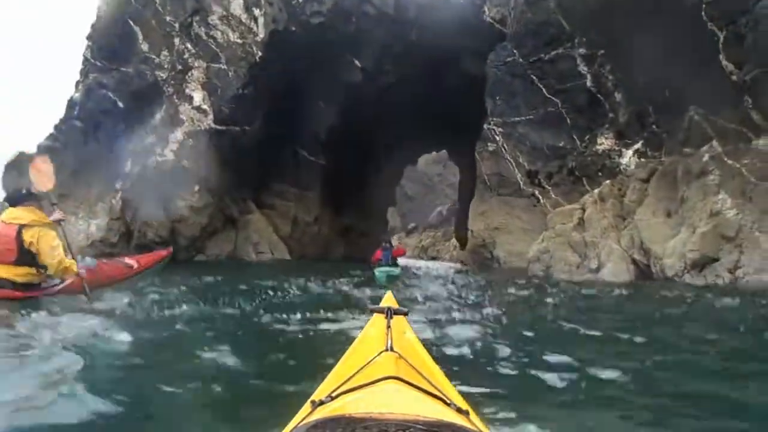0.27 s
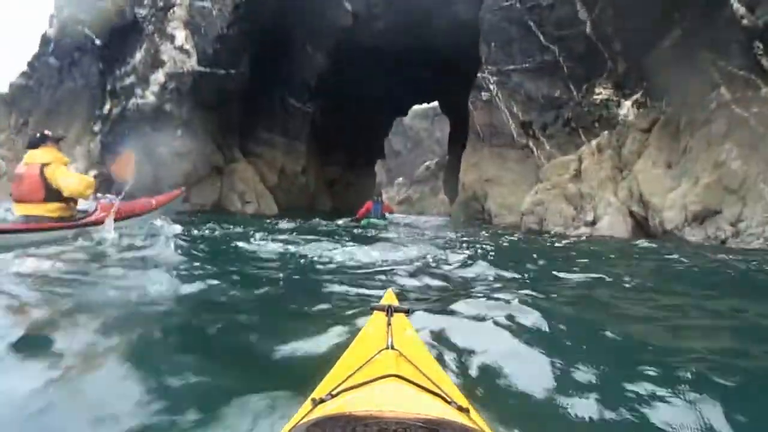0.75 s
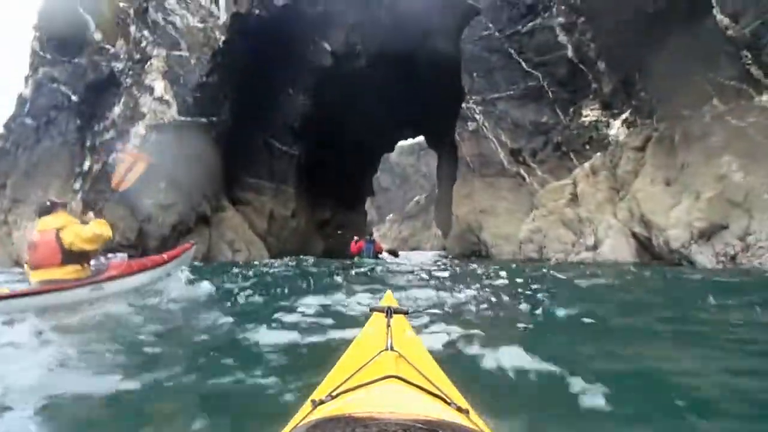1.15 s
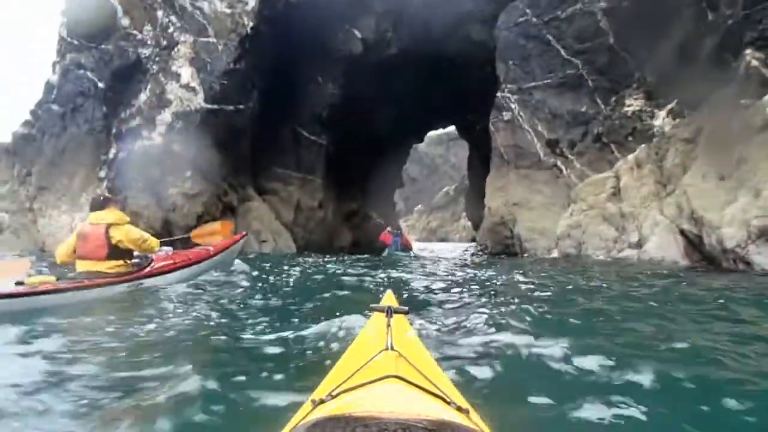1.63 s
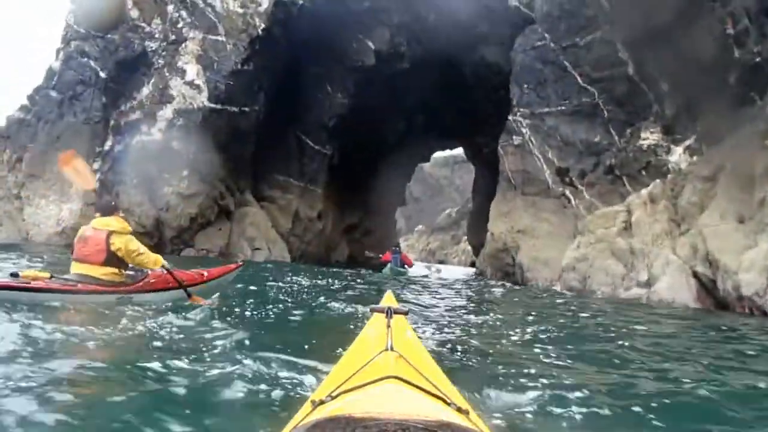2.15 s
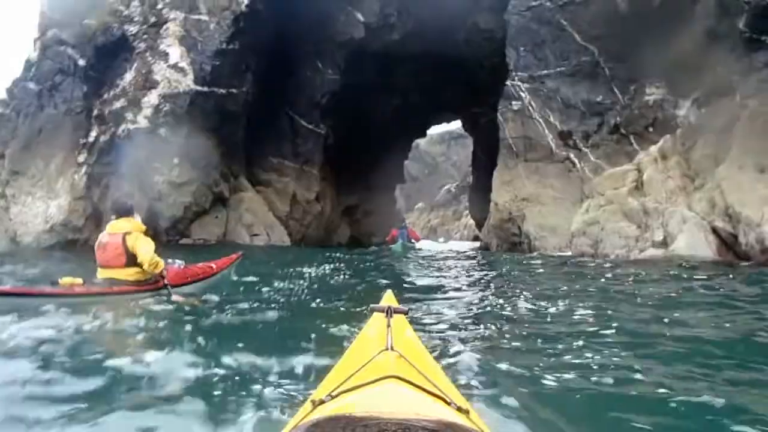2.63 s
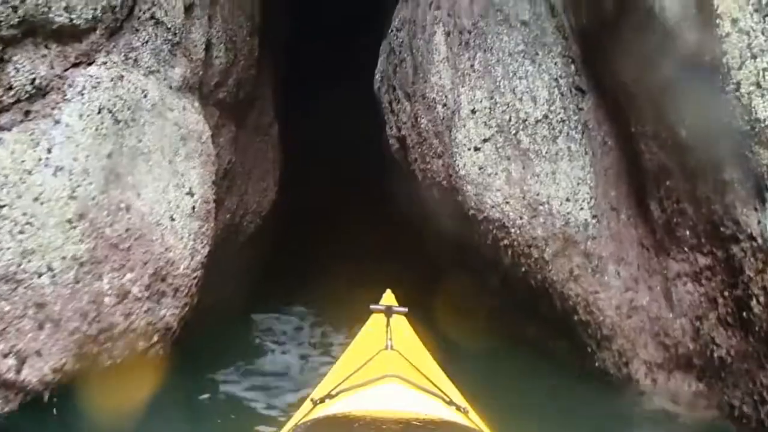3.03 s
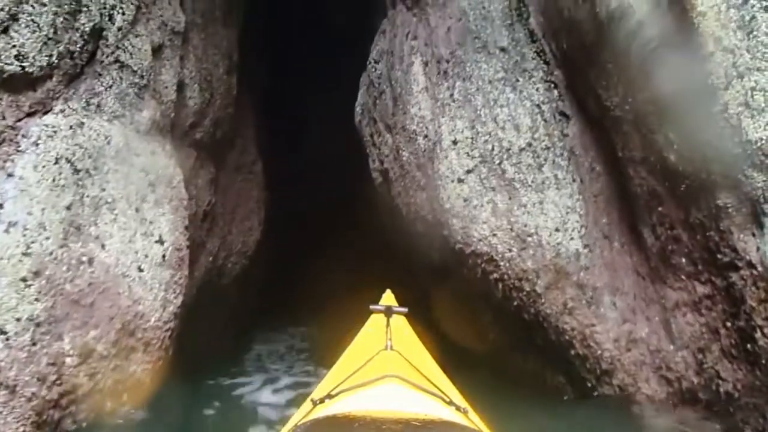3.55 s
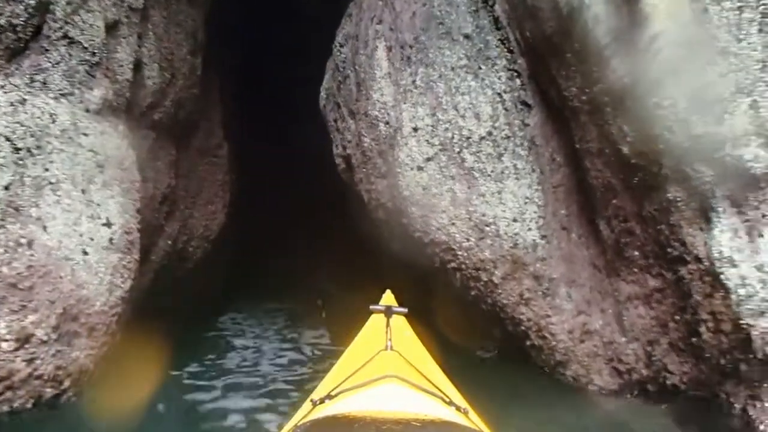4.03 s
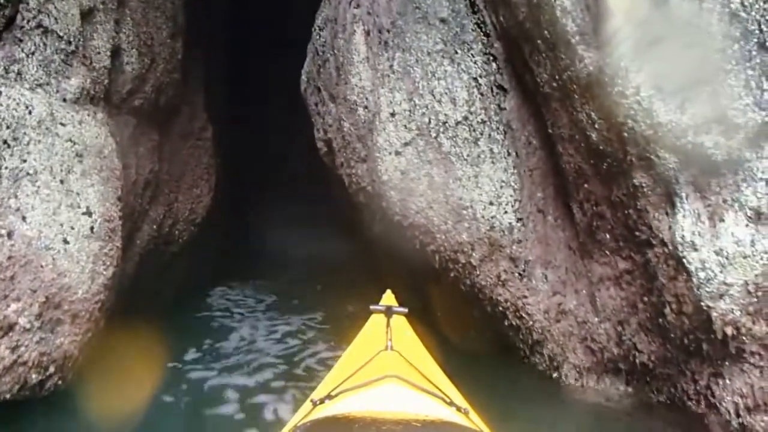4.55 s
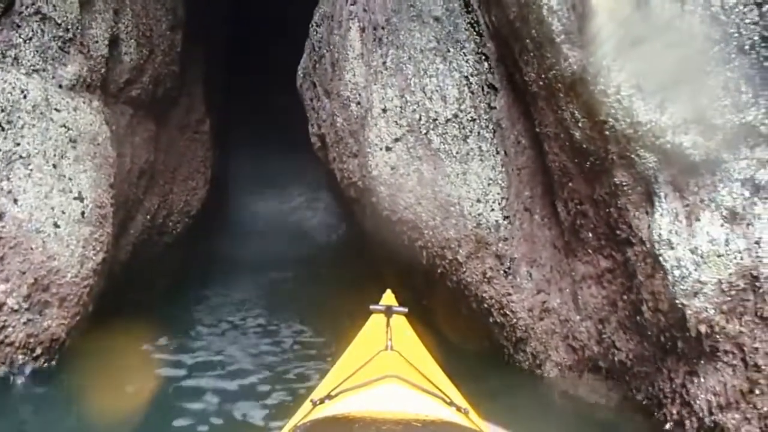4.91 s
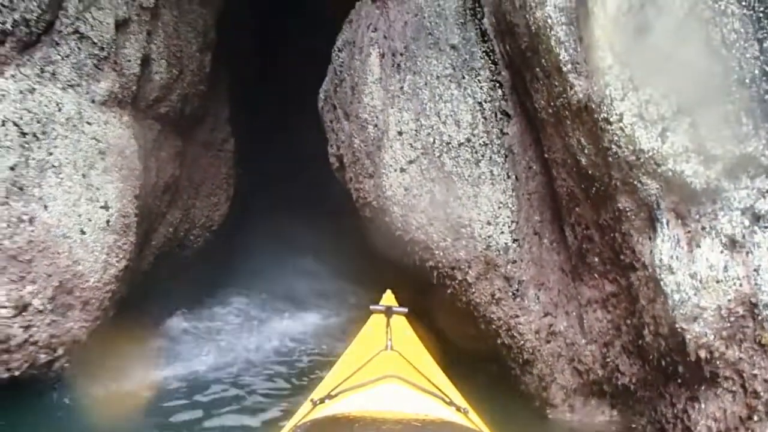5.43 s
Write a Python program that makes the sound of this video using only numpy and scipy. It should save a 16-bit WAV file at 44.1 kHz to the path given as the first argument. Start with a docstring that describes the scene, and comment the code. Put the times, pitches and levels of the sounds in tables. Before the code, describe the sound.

A close, mono microphone in a waterproof case hears quiet sea water: low lapping, soft slosh, fizzing foam, drips and bubbly plops. Just before three seconds, a sharp change brings a burst of splash and hiss between rock walls. Waves then break in overlapping surges, growing strongest past four seconds, with a deep cavity boom, a heavy thump near five seconds, and a bright watery wash continuing to the end.

```python
"""Sea water laps around a kayak below a cliff: clouds of damped, rising sines over noise make lap, slosh and foam.
Drops tick as short ringing bursts, trapped air thumps as unsteady low sines, and large bubbles plop as gliding sines.
Then the boat lies in a narrow rock gully: waves break into churn, splash and hissing spray, made of bubbles
and noise under surge envelopes, and swells boom through the air modes of the cleft.
All is mono; a waterproof housing rings in the treble of the water and the drops."""
import sys
import numpy as np
from scipy import signal
from scipy.fft import rfft, irfft, next_fast_len
from scipy.io import wavfile
from scipy.ndimage import map_coordinates

SR = 44100
rng = np.random.default_rng(int(sys.argv[2]) if len(sys.argv) > 2 else 0)


def store_pcm(level_fs):
    """Save levels as 16-bit WAV."""
    pcm = np.round(np.clip(level_fs, -1, 1) * 32767).astype(np.int16)
    wavfile.write(sys.argv[1], SR, np.atleast_2d(pcm).T)


N = 250047  # length [samples]


def amp(db):
    """Logarithmic level: decibels to an amplitude gain."""
    return 10 ** (np.asarray(db) / 20)


def unit(x):
    """Normalisation of power: scale to rms 1."""
    return x / np.sqrt(np.mean(x ** 2) + 1e-20)


def curves(rows):
    """Linear interpolation: one value per sample for each column after the time."""
    knot_s, *columns = np.transpose(rows)
    return [np.interp(np.arange(N) / SR, knot_s, column) for column in columns]


def wobble(rate):
    """Band-limited random modulation: a smooth curve through rate random knots a second."""
    knots = rng.standard_normal(int(N * rate / SR) + 4)
    return map_coordinates(knots, [np.arange(N) * rate / SR])


def filtered(x, response):
    """Linear filtering: the spectrum of x times a response of frequency."""
    size = next_fast_len(N + SR // 2)
    hz = np.fft.rfftfreq(size, 1 / SR)
    return irfft(rfft(x, size) * response(hz), size)[:N]


def shape(points, hz):
    """Spectral envelope: gain of (frequency [Hz], gain [dB]) points joined on a log axis."""
    point_hz, db = np.transpose(points)
    return amp(np.interp(np.log(hz + 1), np.log(point_hz), db))


def resonance(hz, centre, width):
    """Damped simple oscillator: causal response of one mode, 1 at its centre."""
    return 1j * hz * width / (centre ** 2 - hz ** 2 + 1j * hz * width)


# resonances of the waterproof housing: (centre [Hz], width [Hz], gain of the mode alone [dB])
HOUSING_MODES = [(5750, 870, 6), (12740, 2140, 9)]


def housing(hz):
    """Modal resonance of an enclosure: each mode adds its lift to the direct sound."""
    lifts = [(amp(db) - 1) * resonance(hz, centre, width) for centre, width, db in HOUSING_MODES]
    return 1 + sum(lifts)


def add(track, start_s, sound):
    """Superposition: mix a sound into the track from its start time."""
    part = track[max(round(start_s * SR), 0):][:len(sound)]
    part += sound[:len(part)]


def bubbles(count, low_hz, high_hz, cycles, rise, spread_db):
    """Volume pulsation of gas bubbles: damped sines that rise in pitch near the surface; rms 1."""
    when, radius, strength = rng.random((count, 3)).T
    hz = low_hz * (high_hz / low_hz) ** radius
    size = amp(-spread_db * np.log(1 - .985 * strength)) * hz / low_hz
    length = (cycles * SR / hz).astype(int) + 2
    # lay all bubbles end to end, then sum each sample into its place in time
    who = np.repeat(np.arange(count), length)
    age = np.arange(len(who)) - np.repeat(np.cumsum(length) - length, length)
    life_share = age / length[who]
    decay = np.exp(-np.log(50) * life_share)
    phase = 2 * np.pi * cycles * life_share * (1 + rise * life_share / 2)
    wave = size[who] * decay * np.sin(phase)
    return unit(np.bincount((when * N).astype(int)[who] + age, wave, N)[:N])


def water(spectrum, grains, wash_db, flutter_db):
    """Incoherent summation: near bubbles over a noise wash of far ones, fluttering with ripples; rms 1."""
    colour = lambda hz: shape(spectrum, hz) * housing(hz)
    near = unit(filtered(grains, colour))
    far = unit(filtered(rng.standard_normal(N), colour))
    ripples = wobble(45)
    return unit((near + amp(wash_db) * far) * amp(flutter_db * ripples))


def patter(grains):
    """Excitation of a resonant enclosure: tiny drops tick through the housing; rms 1."""
    return unit(filtered(grains, housing))


GULLY_S = 2.745  # middle of the passage into the gully


def inside():
    """Crossfade: 0 on open water, 1 between the rocks, with a ramp of 46 ms."""
    return np.clip((np.arange(N) / SR - GULLY_S) / 0.046 + .5, 0, 1)


# filter that colours the lapping: (frequency [Hz], gain [dB])
LAP_COLOUR = [(20, -16), (50, -3), (100, -1), (160, 6), (230, 7), (380, -10.5), (700, 3), (1500, -50)]
# how lapping follows the sloshing: (mean level [dB], gain per level of sloshing [dB/dB])
LAP_LEVEL = (-50.5, 1.15)


def lapping(slosh_db):
    """Pulsation of large bubbles: wavelets lap low at the hull, livelier as the sloshing grows."""
    mean_db, growth = LAP_LEVEL
    lap_db = mean_db + growth * (slosh_db - slosh_db.mean())
    grains = bubbles(count=600, low_hz=92, high_hz=455, cycles=2.8, rise=0.22, spread_db=0.5)
    return amp(lap_db) * water(LAP_COLOUR, grains, wash_db=-1, flutter_db=0.5)


# filter that colours the sloshing: (frequency [Hz], gain [dB])
SLOSH_COLOUR = [(120, -29), (280, -3.5), (480, -0.5), (850, 3.5), (1400, -0.5), (2200, -10.5), (4500, -22)]


def sloshing(slosh_db):
    """Air entrainment: water sloshing along the cliff foot folds in mid-sized bubbles."""
    grains = bubbles(count=4500, low_hz=348, high_hz=2480, cycles=5.3, rise=0.4, spread_db=4.0)
    return amp(slosh_db + 0.5) * water(SLOSH_COLOUR, grains, wash_db=7.5, flutter_db=1.8)


# filter that colours the foam: (frequency [Hz], gain [dB])
FOAM_COLOUR = [(700, -20), (1700, -1), (3000, 1.5), (4600, -4.5), (6200, -3), (8500, -9.5), (12500, -11),
               (15500, -21.5)]


def foaming(foam_db):
    """Pulsation of small bubbles: foam fizzes, a few bubbles tinkle and tiny drops patter."""
    grains = bubbles(count=6000, low_hz=1753, high_hz=12500, cycles=29, rise=0.29, spread_db=4.5)
    foam = water(FOAM_COLOUR, grains, wash_db=6.0, flutter_db=1.33)
    # close to the hull, clear of the foam
    trickle = bubbles(count=160, low_hz=1595, high_hz=6300, cycles=28, rise=.12, spread_db=-0.5)
    ticks = patter(bubbles(count=400, low_hz=2000, high_hz=11200, cycles=6, rise=.1, spread_db=5.5))
    return amp(foam_db + 1) * (foam + amp(-12.5) * trickle + amp(-18) * ticks)


# liveliness of the open water: (time [s], sloshing before trim [dB], foam before trim [dB])
OPEN_WATER_LEVELS = [(0.0, -40.5, -37), (0.61, -43, -38.5), (0.75, -44, -39.5), (0.95, -44.5, -39.5),
                     (1.26, -41, -37.5), (1.52, -42, -37.5), (1.72, -37.5, -36.5), (1.9, -40, -34),
                     (2.06, -34, -34), (2.27, -39, -36.5), (2.5, -41, -37), (2.65, -37, -36),
                     (2.74, -28.5, -32)]


def open_water():
    """Common modulation: one course of sloshing levels drives lapping and sloshing, a second course drives the
    bursting foam."""
    slosh_db, foam_db = curves(OPEN_WATER_LEVELS)
    return lapping(slosh_db) + sloshing(slosh_db) + foaming(foam_db)


# loudest drops near the microphone:
# (time [s], level before trim and housing [dB], pitch [Hz], length of ringing [cycles])
NEAR_DROPS = [(0.0853, -8, 6260, 3), (0.68, -21, 2110, 3.6), (1.0315, -26, 5650, 6), (1.094, -9, 4600, 3.7),
              (1.1074, -8.5, 8000, 1.6), (1.202, -4, 8800, 2.3), (1.293, -24, 3050, 16),
              (1.45, -18.5, 2540, 6.1), (1.654, -24.5, 3170, 14), (1.835, -19, 5500, 10),
              (2.007, -14, 8500, 4), (2.1882, -15, 2850, 4.2), (2.4365, -18, 3020, 5.4),
              (2.667, -14.5, 5900, 6), (2.689, -14, 3220, 10), (2.7, -14, 2560, 5.1),
              (2.715, -10, 9000, 2.5), (2.899, -10, 5770, 11), (2.915, -15, 12200, 18),
              (2.938, 2, 4000, 4.2), (3.234, -11, 5760, 9), (3.476, -12, 11000, 5.5),
              (3.5, -2.5, 2840, 2.3)]


def drops():
    """Impact excitation: each drop rings briefly and scatters spatter around its own pitch."""
    out, t = np.zeros(N), np.arange(SR // 30) / SR
    for start_s, db, hz, cycles in NEAR_DROPS:
        age = 5 * hz * t / cycles
        tick = age * np.exp(1 - age) * np.sin(2 * np.pi * hz * t)
        # noise convolved with the tick takes on its pitch
        spatter = unit(signal.fftconvolve(rng.standard_normal(len(t)), tick)[:len(t)])
        spatter_decay = amp(-60 * t / 0.034)
        add(out, start_s, amp(db - 3.5) * (tick + 0.059 * spatter * spatter_decay))
    return filtered(out, housing)


# waves that slap the hull or trap air under the rock:
# (time [s], level before trim and onset [dB], mean pitch [Hz], time to fall by 26 dB [s])
AIR_POCKETS = [(.428, -35, 109, 0.055), (0.976, -38, 213, 0.14), (1.32, -39, 70, .05),
               (1.44, -37, 90, 0.042), (1.716, -33.5, 213, 0.1), (2.02, -29, 139, 0.042),
               (2.11, -38, 210, 0.13), (2.258, -26, 128, 0.026), (2.84, -31.5, 166, 0.14),
               (3.201, -27, 178, 0.042), (3.79, -24, 73.5, 0.12), (3.899, -30, 111.5, 0.36),
               (3.798, -26, 195, 0.28), (4.42, -25, 57.5, 0.2), (4.599, -22, 147, 0.092),
               (4.951, -14.5, 93, 0.042), (4.955, -19, 238, 0.079)]


def thumps():
    """Cavity pulsation: a wave closes on a pocket of air, which throbs for a few uneven cycles."""
    out, t = np.zeros(N), np.arange(SR // 2) / SR
    for start_s, db, hz, fall_s in AIR_POCKETS:
        pitch = hz * (1 + 0.08 * wobble(69)[:len(t)])
        onset = 1 - np.exp(-t / 0.0059)
        decay = amp(db - 4 - 26 * t / fall_s)
        add(out, start_s, onset * decay * np.sin(2 * np.pi * np.cumsum(pitch) / SR))
    return out


# single large bubbles beside the hull:
# (time [s], level before trim and onset [dB], starting pitch [Hz], pitch rise [octaves])
LARGE_BUBBLES = [(0.574, -28, 1480, .25), (.891, -23, 746, 0.62), (1.719, -32, 300, .3),
                 (1.732, -23, 428, 0.64), (1.751, -34, 340, .4), (2.127, -21, 770, 0.74),
                 (2.419, -20, 1160, .35), (2.4625, -21, 614, .73), (2.470, -20.5, 950, 0.49),
                 (2.697, -21, 670, .3), (4.186, -14, 1170, 0.37), (5.382, -18, 394, 0.051)]
PLOP_LIFE_S = 0.0145  # from pinching off to surfacing


def plops():
    """Pulsation near a free surface: a bubble pinches off with a small splash, glides up and dies away."""
    out, t = np.zeros(N), np.arange(SR // 12) / SR
    age = t / PLOP_LIFE_S
    for start_s, db, hz, octaves in LARGE_BUBBLES:
        pitch = hz * 2 ** (octaves * np.minimum(age, 1))
        onset = 1 - np.exp(-t / 0.0012)
        decay = amp(db - 1.0 - 10 * age - 10 * age ** 2)
        ring = np.sin(2 * np.pi * np.cumsum(pitch) / SR)
        small_splash = 0.15 * rng.standard_normal(len(t))
        add(out, start_s, onset * decay * (ring + small_splash))
    return out


def surge(start, rise, hold, fade):
    """Build-up and exponential decay: one wave grows smoothly, holds, then drains away."""
    t = np.arange(N) / SR - start
    growth = np.sin(np.pi / 2 * np.clip(t / rise, 0, 1)) ** 2
    return growth * np.exp(-np.maximum(t - rise - hold, 0) / fade)


def piled(rest_db, peaks_db, envelopes):
    """Addition of powers: level [dB] of overlapping waves over the resting water of the gully."""
    rest_power = inside() * amp(rest_db) ** 2
    wave_power = amp(peaks_db) ** 2 @ np.square(envelopes)
    return 10 * np.log10(rest_power + wave_power + 1e-20)


# filters that colour churn, splash and spray: (frequency [Hz], gain [dB])
CHURN_COLOUR = [(120, -40), (300, -7), (550, -3), (1100, 1), (1700, -2.5), (2600, -8), (5000, -37)]
SPLASH_COLOUR = [(700, -25), (1600, -2.5), (2400, 1), (4200, -0.5), (6000, -4.5), (8000, -13), (14000, -20)]
SPRAY_COLOUR = [(2000, -46), (4500, -6.5), (6300, 5.5), (9000, 0), (12500, -3), (14500, -12.5),
                (15600, -20)]
# waves that break on the gully walls: (start [s], rise [s], hold [s], fade time constant [s],
# splash before thinning and patter [dB], churn [dB], spray [dB])
BREAKING_WAVES = [(2.573, 0.05, .08, .04, -36, -50, -37), (2.738, 0.017, 0.0082, 0.075, -21, -28.5, -26),
                  (2.799, 0.058, 0.051, 0.018, -21.5, -29, -24.5), (3.02, 0.13, 0.073, 0.17, -24, -28, -29),
                  (3.314, .075, 0.11, 0.24, -27, -33.5, -31.5), (3.632, 0.24, 0.059, 0.15, -21, -23.5, -30),
                  (4.12, 0.068, .015, 0.1, -23.5, -25.5, -31), (4.024, 0.18, 0.16, 0.11, -31, -58, -24.5),
                  (4.255, 0.076, 0.057, 0.12, -20.5, -25.5, -19.5),
                  (4.356, 0.08, 0.14, 0.17, -22.5, -24, -23.5), (4.54, .52, 0.15, 0.7, -22, -47, -20.5),
                  (4.833, 0.11, .02, 0.079, -22, -55, -18.5), (5.275, 0.058, 0.27, 0.32, -26, -28, -28),
                  (5.56, 0.049, 0.035, .1, -24, -35, -24)]


def breakers():
    """Entrainment and break-up: waves churn in the gully, splash on the rock and throw spray."""
    waves = [surge(*times) for *times, _, _, _ in BREAKING_WAVES]
    *_, splashes_db, churns_db, sprays_db = np.transpose(BREAKING_WAVES)
    # the first level is that of the water astir between waves
    splash_db = piled(-26.5, splashes_db, waves)
    churn_db = piled(-33, churns_db, waves)
    spray_db = piled(-32.5, sprays_db, waves)
    churn_grains = bubbles(count=3500, low_hz=316.3, high_hz=2670, cycles=18.6, rise=0.11, spread_db=-1.5)
    churn = water(CHURN_COLOUR, churn_grains, wash_db=3, flutter_db=0.77)
    splash_grains = bubbles(count=9000, low_hz=1517, high_hz=7440, cycles=29, rise=0.091, spread_db=3.0)
    splash = water(SPLASH_COLOUR, splash_grains, wash_db=6.5, flutter_db=.6)
    spray_grains = bubbles(count=14000, low_hz=4640, high_hz=15100, cycles=5, rise=.1, spread_db=-4.5)
    spray = water(SPRAY_COLOUR, spray_grains, wash_db=12, flutter_db=1.0)
    ticks = patter(bubbles(count=500, low_hz=2600, high_hz=8000, cycles=7, rise=0.065, spread_db=4.0))
    # water that breaks into spray holds fewer large bubbles, so its splash turns thin and bright
    large = filtered(splash, lambda hz: 1 / (1 + (hz / 3000) ** 4))
    thin = np.clip((spray_db - churn_db) / 20, 0, .75)
    splash = (splash - thin * large) / np.sqrt(1 - 0.62 * thin)
    splash = splash + amp(-11.5) * ticks
    return amp(churn_db) * churn + amp(splash_db) * splash + amp(spray_db) * spray


# air resonances of the cleft: (centre [Hz], width [Hz], gain of the mode alone [dB])
CLEFT_MODES = [(63, 9, 6.5), (88.5, 4.6, 4), (112, 6.5, 1), (181, 6.7, -14), (209.4, 4.9, 3.5),
               (233.4, 5.8, -4), (292.5, 40, -5.5), (322.6, 8.2, 1), (414, 8.9, -5.5), (456, 19, 0.5)]


def cleft(x):
    """Modal resonance of a cavity: the narrow cave rings at its low air modes; rms 1."""
    modes = lambda hz: 0.28 + sum(amp(db) * resonance(hz, centre, width) for centre, width, db in CLEFT_MODES)
    return unit(filtered(x, modes))


# filter that colours the boom ahead of the cleft: (frequency [Hz], gain [dB])
BOOM_COLOUR = [(20, -28), (35, -25), (55, -9), (90, -7.5), (160, 4.5), (320, 1), (520, -0.5), (900, 10.5),
               (2000, -70)]
# swells that run into the cleft: (start [s], rise [s], fade time constant [s], boom at full depth [dB])
CLEFT_SWELLS = [(2.68, 0.082, 0.056, -45), (3.05, .11, 0.073, -44), (3.552, 0.27, 0.67, -38),
                (4.16, 0.3, 0.14, -22.5), (4.87, 0.054, 0.081, -31), (5.26, 0.18, 0.089, -38.5)]
SWELL_HOLD_S = 0.083  # a swell stays at its crest this long
DEEP_FROM_DB = -38  # stronger swells boom with their full depth


def booming():
    """Forced resonance of trapped air: swells squeeze the air of the cleft, which booms."""
    swells = [surge(start_s, rise, SWELL_HOLD_S, fade) for start_s, rise, fade, _ in CLEFT_SWELLS]
    boom_db = piled(-47, [db for *_, db in CLEFT_SWELLS], swells)
    grains = bubbles(count=1400, low_hz=55.4, high_hz=636, cycles=6.6, rise=0.2, spread_db=4.0)
    boom = cleft(water(BOOM_COLOUR, grains, wash_db=0.5, flutter_db=-0.8))
    # a weak swell traps only small pockets of air, so its boom lacks depth
    deep = filtered(boom, lambda hz: 1 / (1 + (hz / 130) ** 4))
    missing_depth = np.clip((DEEP_FROM_DB - boom_db) / 8, 0, .45)
    return amp(boom_db) * (boom - missing_depth * deep)


def scene():
    """Superposition of sources: open water gives way to the gully, alike in both channels."""
    water_outside = np.sqrt(1 - inside()) * open_water()
    mono = water_outside + drops() + thumps() + plops() + breakers() + booming()
    return np.array([mono, mono])


def record(dry):
    """Band limitation: an ideal low-pass keeps nothing from 15750 Hz up."""
    return np.array([filtered(x, lambda hz: hz < 15750) for x in dry])


dry = scene()
out = record(dry)
store_pcm(out)
```